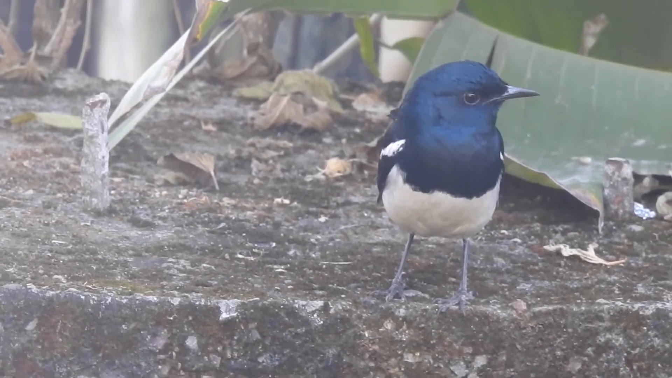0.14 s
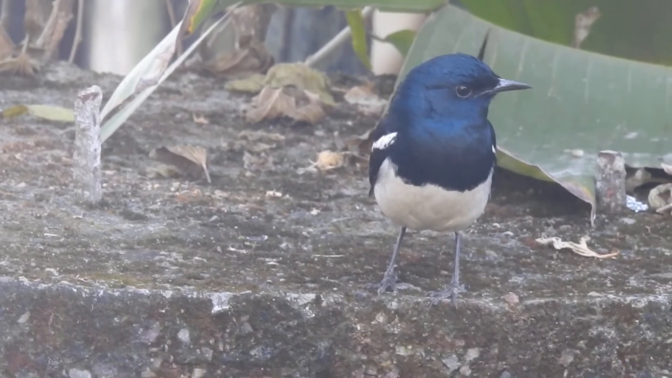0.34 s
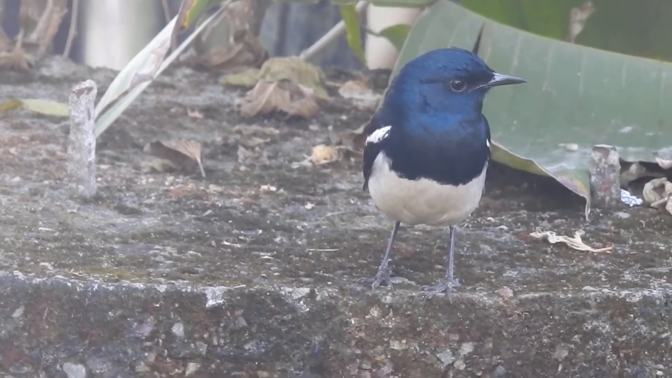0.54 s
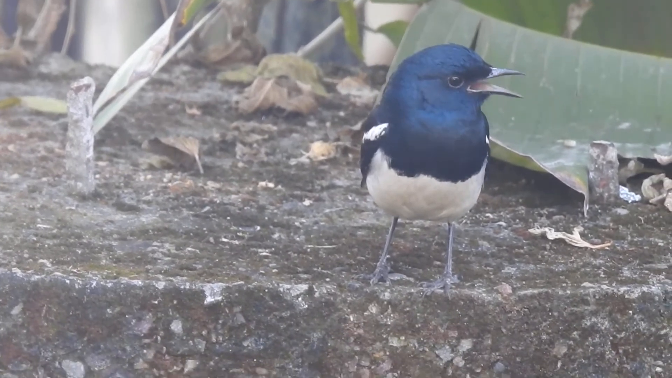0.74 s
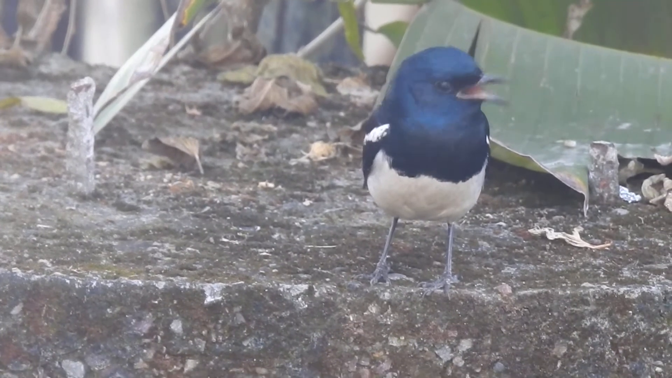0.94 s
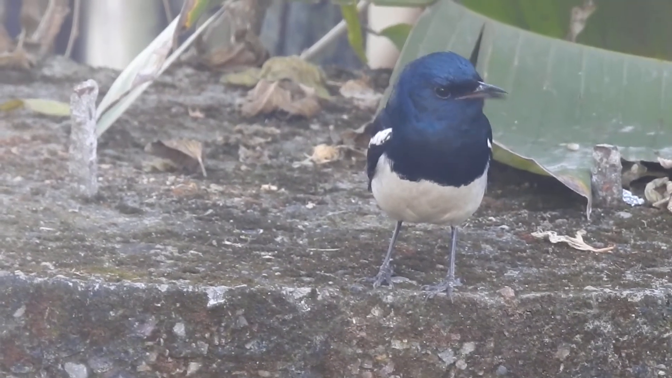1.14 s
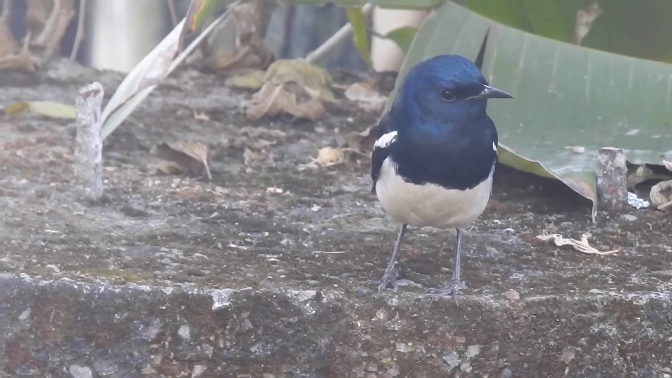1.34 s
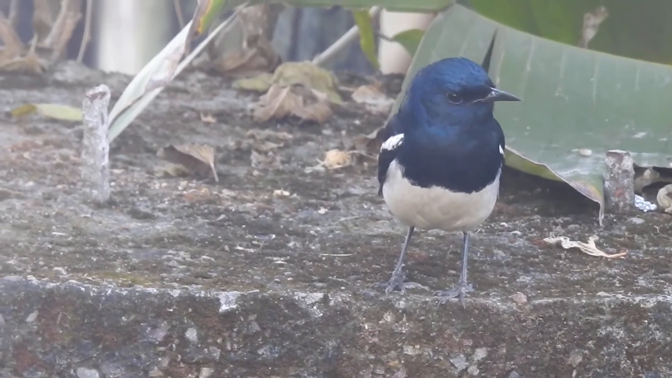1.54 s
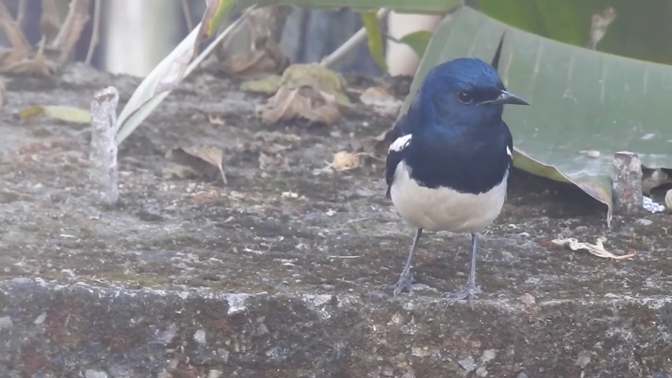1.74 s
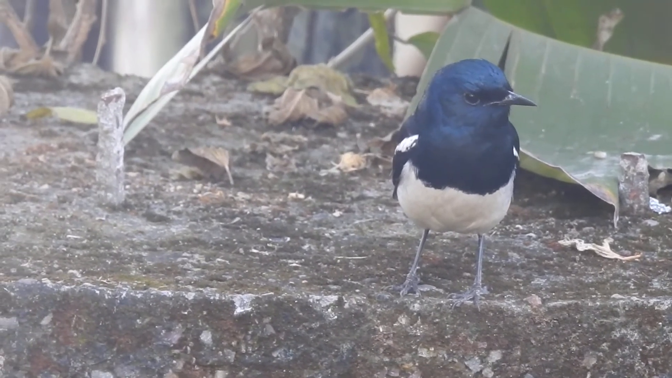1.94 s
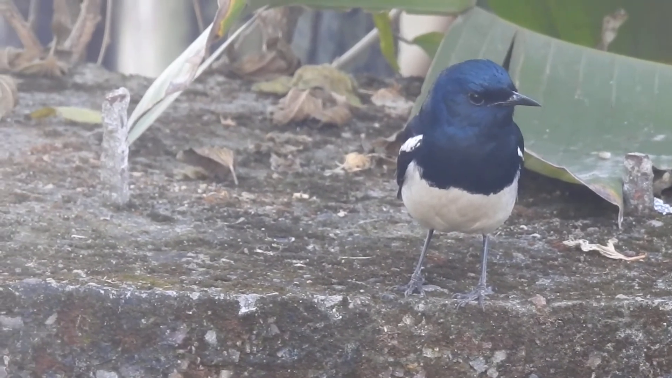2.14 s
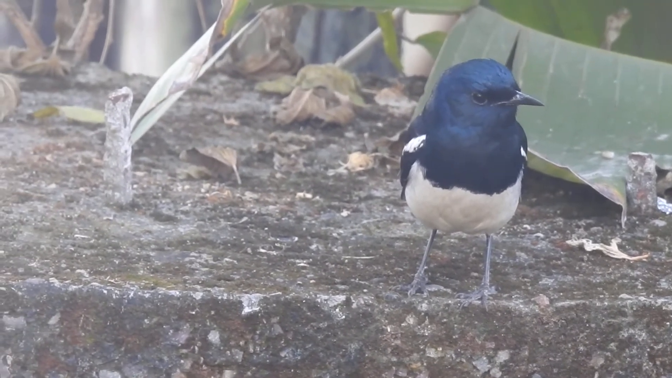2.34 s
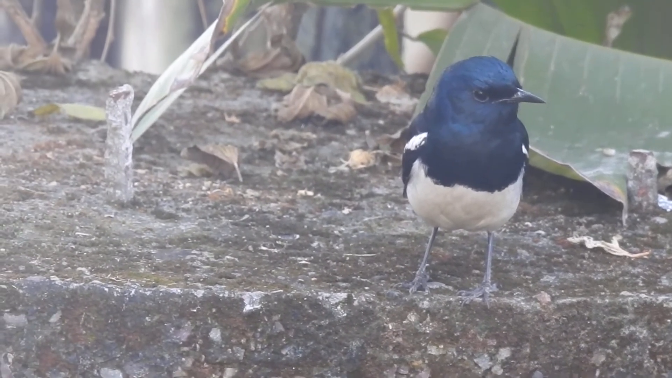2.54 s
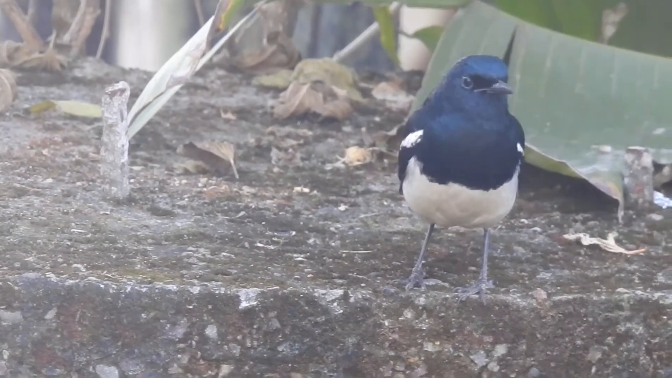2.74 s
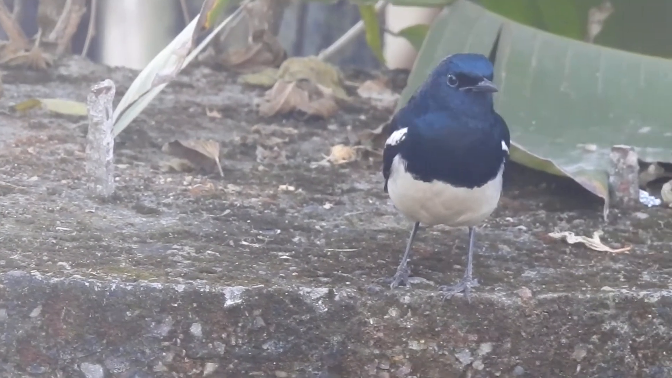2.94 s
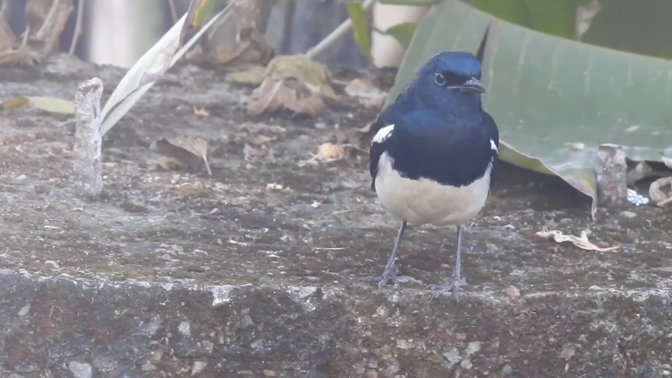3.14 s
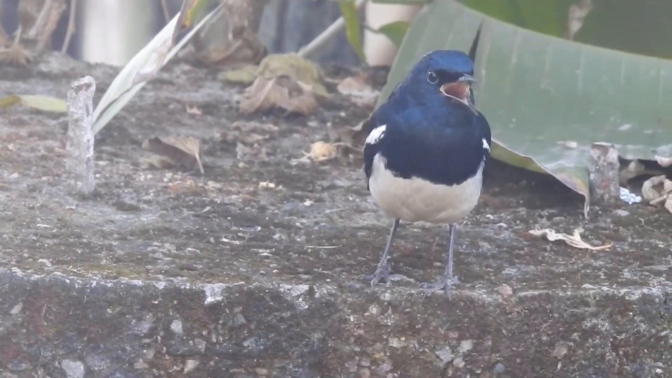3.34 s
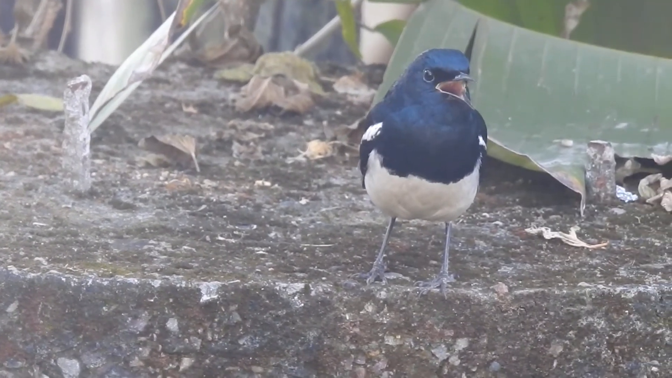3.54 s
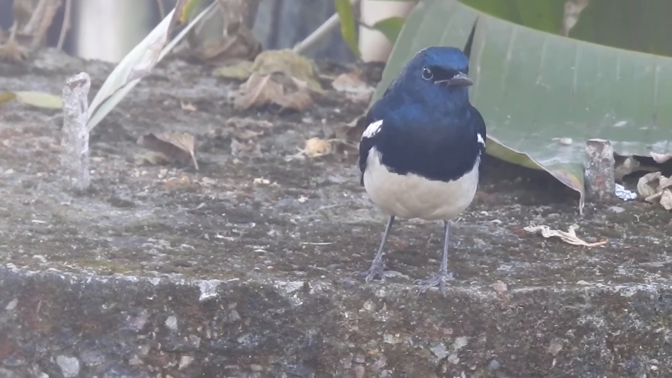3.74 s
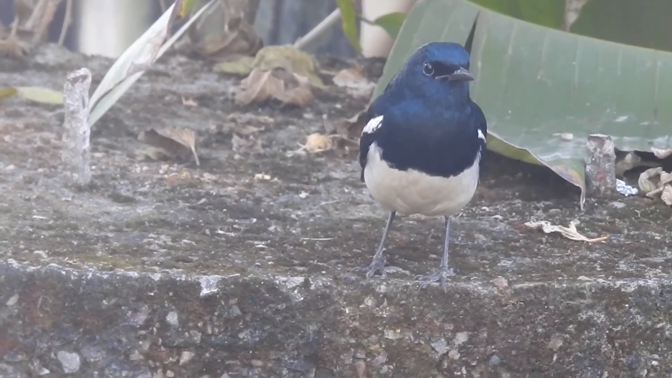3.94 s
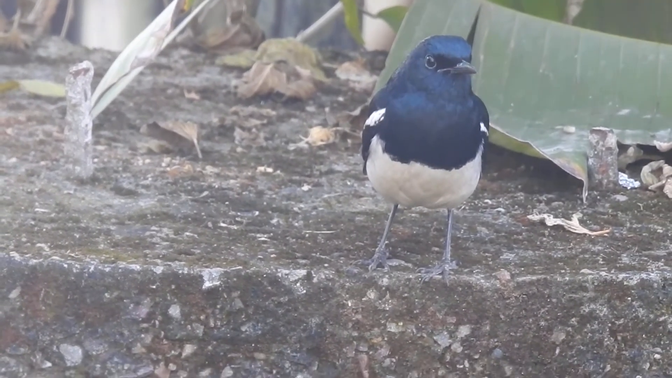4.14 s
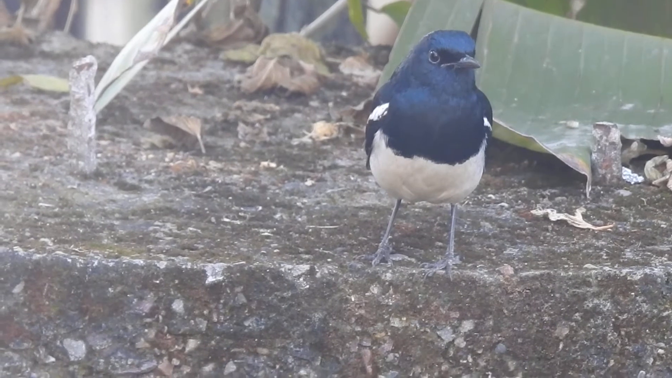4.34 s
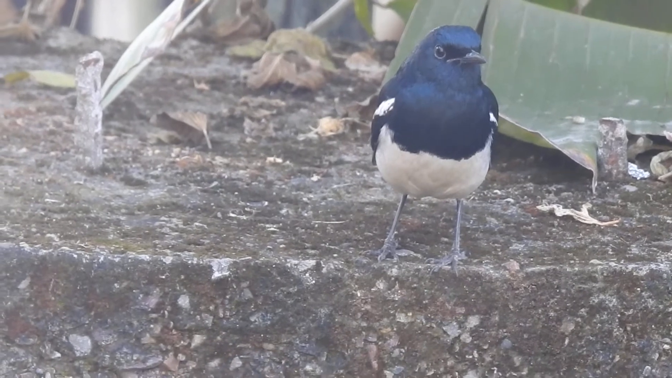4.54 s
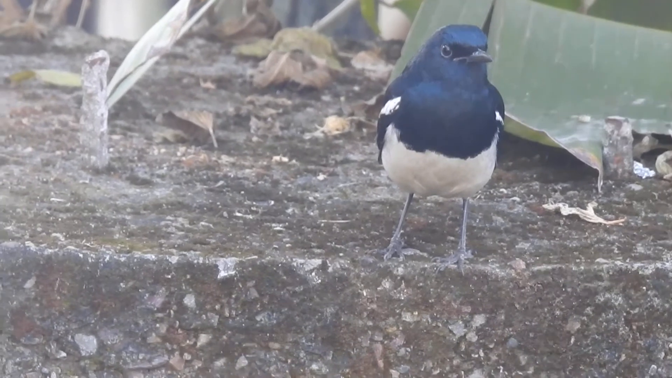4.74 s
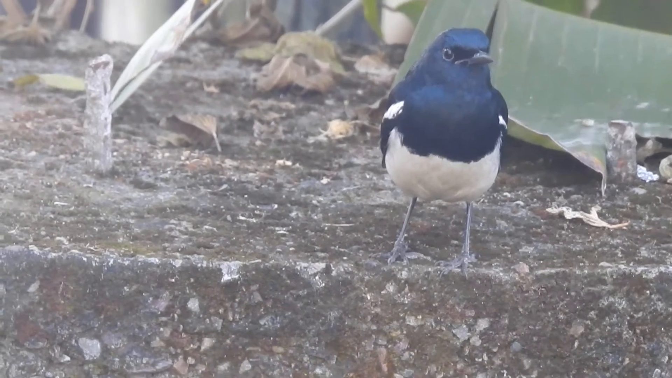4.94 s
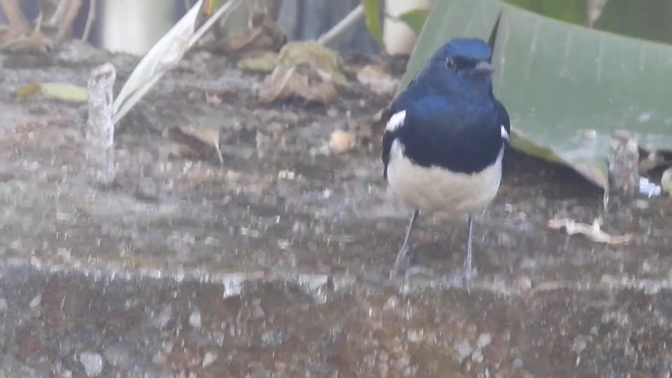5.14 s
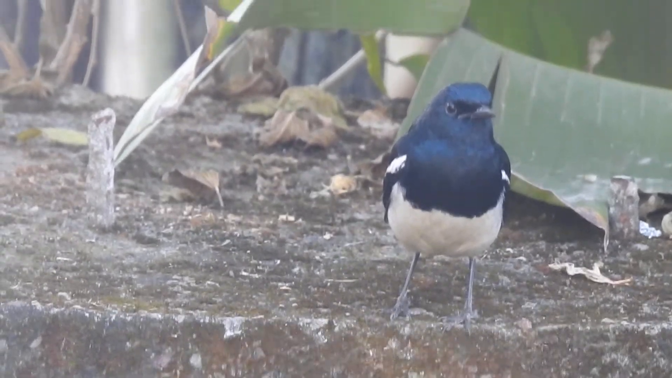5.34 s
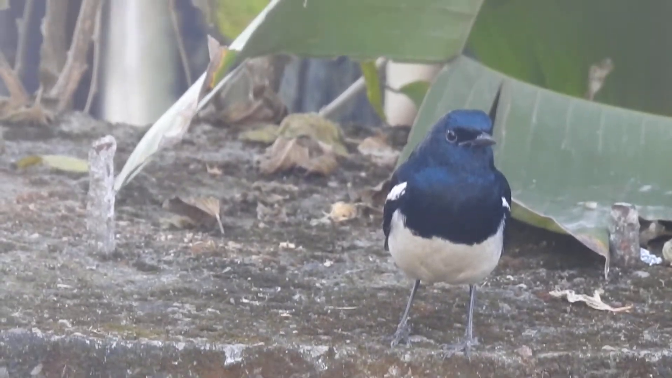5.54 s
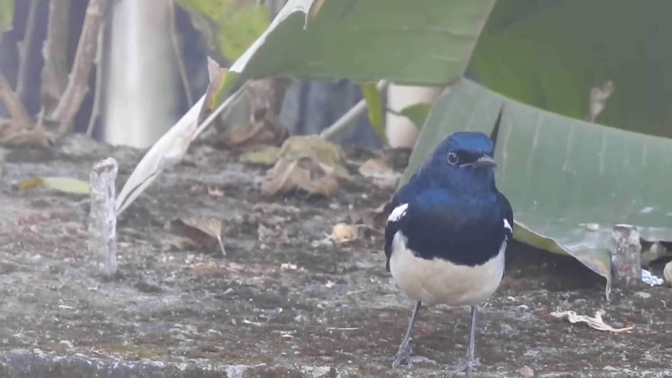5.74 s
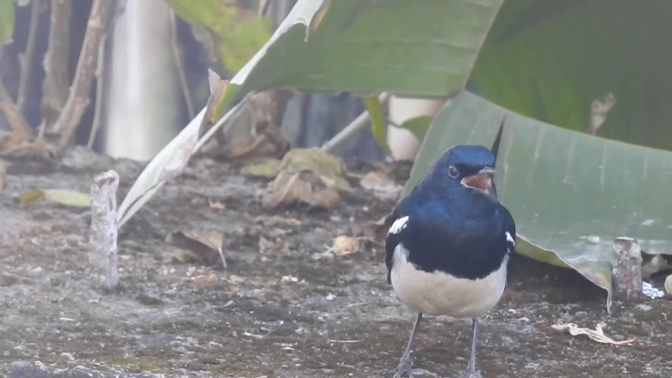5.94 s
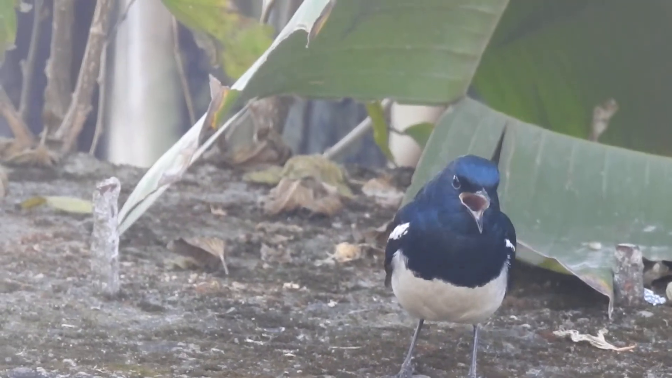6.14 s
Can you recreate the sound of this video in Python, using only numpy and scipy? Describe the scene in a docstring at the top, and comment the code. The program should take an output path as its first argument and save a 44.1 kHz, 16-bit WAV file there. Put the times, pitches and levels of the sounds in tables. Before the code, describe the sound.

Piercing down-slurred bird whistles, each growing raspy, ring out three times in a garden while distant rumble and brief microphone wind thumps sit underneath.

```python
"""A distant town rumbles under a soft high hiss; then a magpie-robin on a garden wall gives three whistles
that slide downward and turn husky, the last still sounding at the end. Each is a gliding sine that gains
noise, overtones and a second voice. Walls and foliage return the notes as echoes and scattered paths. A far
bird chirps in short raspy glides. Gusts, as swelling low noise, and a few filtered pressure kicks buffet the
microphone, mostly on the right."""
import sys
import numpy as np
from scipy import signal
from scipy.fft import rfft, irfft, next_fast_len
from scipy.io import wavfile
from scipy.ndimage import uniform_filter1d, minimum_filter1d

SR = 44100
rng = np.random.default_rng(int(sys.argv[2]) if len(sys.argv) > 2 else 0)


def store_pcm(level_fs):
    """Save levels as 16-bit WAV."""
    pcm = np.round(np.clip(level_fs, -1, 1) * 32767).astype(np.int16)
    wavfile.write(sys.argv[1], SR, np.atleast_2d(pcm).T)


N = 273861
TIME = np.arange(N) / SR   # seconds

# The robin's whistles. Each row: start in seconds, length in seconds, start pitch in Hz, shelf pitch in Hz,
# settling time in seconds, age at the step in seconds, age at which the hold ends in seconds, end pitch in Hz,
# level in dB before the mix, attack in seconds, age at softening in seconds, late push in dB, age when
# huskiest in seconds, peak huskiness in dB, overtone offset in dB, second voice's start pitch in Hz,
# second voice's offset in dB.
WHISTLE_NOTES = [(0.712, .492, 6235, 5120, .084, 0.047, .31, 4550, -11.5, 0.0075, .14, 2, 0.37, -56, 2.5, 4510, -3),
                 (3.244, .508, 6140, 4988, .132, 0.14, .355, 4260, -12, 0.014, 0.21, 1.5, 0.33, -54.5, -1.5, 4510, -1.5),
                 (5.916, .32, 6010, 5213, 0.1207, 0.1234, .33, 4500, -11.5, 0.018, 0.28, 2, .26, -54.5, -3, 4690, -1)]
# Colour of the husky breath. Each row: frequency in Hz, relative level in dB.
HUSK_SPECTRUM = [(2500, -23), (3300, -7.5), (4500, 0.5), (5800, -12), (6500, 4.5), (7400, -5), (8700, -9),
                 (9500, -23.5), (11000, -33.5), (15500, -33.5)]
# Near reflections. Each row: delay left in seconds, delay right in seconds, level in dB re the direct sound.
NEAR_ECHOES = [(.0062, .0065, -10), (0.0161, .0161, -7.5), (0.033, 0.053, -19.5), (.058, .0573, -27),
               (0.103, .105, -27)]
# The far bird's glides. Each row: start in seconds, length in seconds, start pitch in Hz, end pitch in Hz,
# peak level in dB.
FAR_CHIRPS = [(2.39, 0.056, 3120, 3450, -42), (2.528, 0.053, 3150, 2916, -45.5),
              (2.569, 0.035, 2780, 2780, -53), (2.632, 0.06, 3320, 2870, -44.5),
              (2.677, 0.07, 2950, 2740, -47)]
# Turbulent gusts. Each row: centre in seconds, width in seconds, level in dB before the wind gain and pan.
WIND_GUSTS = [(2.61, 0.05, -35.5), (2.96, 0.014, -34.5), (3.14, 0.083, -38), (3.51, 0.041, -39),
              (4.11, 0.08, -37.5), (4.76, 0.13, -32), (5.23, 0.17, -41)]
# Colour of the gusts. Each row: frequency in Hz, relative level in dB.
GUST_SPECTRUM = [(20, -18.5), (40, 0.5), (68, 1.5), (105, -7), (160, -21), (300, -49.5), (900, -100)]
# Eddies that kick a port, singly or in a dying run. Each row: start in seconds, peak level in dB,
# left minus right in dB, number of kicks.
EDDY_KICKS = [(3.168, -26.5, -10, 1), (4.689, -11, -32, 4), (5.352, -26.5, -22, 1)]
# Course of the background level, which sinks under the whistles. Each row: time in seconds,
# level in dB before the background gain.
BACKGROUND_LEVEL = [(0, -52.5), (0.65, -53.5), (0.8, -56.5), (1.35, -56.5), (1.5, -53), (2.45, -53),
                    (3.0, -56), (3.6, -58), (4.1, -57), (5.55, -55.5), (5.87, -52), (6.0, -57)]
# Colour of the town. Each row: frequency in Hz, relative level in dB.
TOWN_SPECTRUM = [(20, -24.5), (40, -13.5), (75, -7), (96, 1), (120, -6.5), (200, -6.5), (330, -13.5),
                 (490, -14), (670, -13), (900, -18), (1700, -20.5), (3500, -25), (4600, -40.5),
                 (8000, -100)]
# The clearest swells in the distant din. Each row: centre in seconds, width in seconds, pitch in Hz,
# level in dB.
DISTANT_SWELLS = [(0.34, 0.043, 727, -49), (0.499, 0.076, 650, -52.5), (1.141, 0.047, 616, -50),
                  (2.5, 0.25, 636, -56.5), (3.1, 0.055, 462.5, -55.5), (5.149, 0.058, 549, -52)]
# Colour of the high hiss. Each row: frequency in Hz, relative level in dB.
HISS_SPECTRUM = [(1500, -35), (2500, -16), (3500, -9), (4800, -5.5), (6000, -1), (6600, -1.5), (7300, -9),
                 (8100, -16.5), (8800, -17.5), (9500, -23.5), (12000, -29), (15800, -31.5)]
# Likeness of the two channels in diffuse sound. Each row: frequency in Hz, left-right correlation (no unit).
CHANNEL_LIKENESS = [(40, 0.98), (120, .85), (500, 0.87), (1200, 0.82), (3000, 0.73), (6000, 0.16),
                    (12000, 0.14)]

# Pitch: a downward flick, a slide that hesitates once and catches up, a hold, a fall
FLICK_HZ, FLICK_S = 199, 0.007
STEP_HZ, STEP_WIDTH_S = 85.4, 0.02   # the deviation peaks at 0.61 of STEP_HZ
SETTLE_SHAPE, FALL_HZ_PER_S = 1.3, 4000
# Effort: the note swells, is loud, then softens; a long note is pushed once more near its end
ONSET_DB, SOFT_DB, SOFTEN_S = -13, -7, 0.022
PUSH_AT_S, PUSH_WIDTH_S = 0.442, 0.031
# Huskiness comes in one swell; the second voice follows it (dB per dB) and slides down
CLEAR_DB, HUSKY_WIDTH_S = -68.5, 0.1
UNDERTONE_DB, UNDERTONE_FOLLOWS, UNDERTONE_FALL_HZ_PER_S = -71, 1.93, 2950
GARDEN_T60_S = 0.69
GUST_PAN_DB = -15.5   # left minus right
BREEZE_DB, BREEZE_AT_S, BREEZE_WIDTH_S = -41.5, 4.19, 0.28   # a slow swell under the gusts
KICK_GAP_S, KICK_LOSS_DB = 0.042, 5
HISS_DB, HISS_DRIFT_DB = -47, 0.7
CUTOFF_HZ = 15800


def whistle(row, start_s=0.0045, release_s=0.0028, wander=0.0024, waver=0.0019, jitter=0.0007,
            flutter_db=1.0, hiss_db=12, second_db=-23, third_db=-40, edge_growth=0.53,
            sum_db=3, difference_db=-4, unsteady=0.04):
    """Two coupled sources: a nearly pure tone gains hiss, overtones and a second voice as it turns husky."""
    (s, length, start_hz, shelf_hz, settle_s, step_s, held_s, end_hz, loud_db, attack_s, loud_s, push_db,
     husky_s, huskiest_db, overtones_db, under_start_hz, under_extra_db) = row
    age = np.clip(TIME - s, 0, length + release_s)
    opening = np.clip(age / start_s, 0, 1)
    closing = np.clip((length - age) / release_s + 1, 0, 1)

    level_db = loud_db + effort(age, attack_s, loud_s, push_db) + flutter_db * drift(30)
    husky_db = CLEAR_DB + (huskiest_db - CLEAR_DB) * bump(age, husky_s, HUSKY_WIDTH_S)
    hz = glide(age, start_hz, shelf_hz, settle_s, step_s, held_s, end_hz)
    unsteadiness = wander * drift(8.7) + waver * drift(45) + jitter * drift(430)
    phase = cycles(uniform_filter1d(hz, size=500) * (1 + unsteadiness))

    # overtones grow with huskiness, and as they sink into the range that the beak lets out
    beak_db = 0.51 * at_hz(HUSK_SPECTRUM, 2 * hz)
    edge = from_db(overtones_db + edge_growth * (husky_db - level_db + 36.5) + beak_db)
    overtones = from_db(second_db) * np.sin(2 * phase) + from_db(third_db) * np.sin(3 * phase)
    tone = np.sin(phase) + edge * overtones

    # the unsteady second voice of the syrinx mixes with the first into sum and difference tones
    under_hz = under_start_hz - UNDERTONE_FALL_HZ_PER_S * age
    under_db = UNDERTONE_DB + UNDERTONE_FOLLOWS * (husky_db - CLEAR_DB) + under_extra_db
    under = cycles(under_hz * (1 + unsteady * drift(350)))
    sum_tone = from_db(sum_db + at_hz(HUSK_SPECTRUM, hz + under_hz)) * np.sin(phase + under)
    difference_tone = from_db(difference_db) * np.sin(2 * phase - under)
    second_voice = np.sin(under) + sum_tone + difference_tone

    voiced = np.sqrt(2) * (from_db(level_db) * tone + from_db(under_db) * second_voice)
    breath = from_db(hiss_db + husky_db) * noise(HUSK_SPECTRUM)
    return opening * closing * (voiced + breath)


def glide(age, start_hz, shelf_hz, settle_s, step_s, held_s, end_hz):
    """Frequency modulation: pitch relaxes to a shelf with one step, then past the hold falls to its end."""
    settling = shelf_hz + (start_hz - shelf_hz) * np.exp(-(age / settle_s) ** SETTLE_SHAPE)
    falling = np.maximum(settling - FALL_HZ_PER_S * np.maximum(age - held_s, 0), end_hz)
    step = STEP_HZ * (step_s - age) / STEP_WIDTH_S * bump(age, step_s, STEP_WIDTH_S)
    flick = FLICK_HZ * np.exp(-age / FLICK_S)
    return falling + step + flick


def effort(age, attack_s, loud_s, push_db):
    """Amplitude envelope in dB relative to the loud opening: exponential onset, softening, late push."""
    onset = ONSET_DB * np.exp(-age / attack_s)
    softened = 0.5 + 0.5 * np.tanh((age - loud_s) / SOFTEN_S)
    return onset + SOFT_DB * softened + push_db * bump(age, PUSH_AT_S, PUSH_WIDTH_S)


def garden(x, scatter_db, early_db=3, early_t60=0.087, spread=0.61, paths_per_s=900):
    """Reflection and scattering: a few discrete echoes, then sparse paths that decay at two rates."""
    t = np.arange(SR) / SR
    mid, side = rng.standard_normal((2, SR)) * (rng.random((2, SR)) < paths_per_s / SR)
    paths = mid + spread * side * [[1], [-1]]   # partly alike in the two channels
    decay = from_db(-60 * t / GARDEN_T60_S) + from_db(early_db - 60 * t / early_t60)
    fade = decay * (t > 0.004)
    response = from_db(scatter_db) * rms_one(paths * fade) / np.sqrt(SR)
    for left_s, right_s, level_db in NEAR_ECHOES:
        response[[0, 1], [int(left_s * SR), int(right_s * SR)]] += from_db(level_db)
    return x + signal.fftconvolve(x[None], response, axes=1)[:, :N]


def far_bird(rough=0.045):
    """Random frequency modulation of short gliding sines makes them raspy."""
    out = np.zeros(N)
    rasp = 1 + rough * drift(450)
    for s, length, start_hz, end_hz, level_db in FAR_CHIRPS:
        along = np.clip((TIME - s) / length, 0, 1)
        hz = start_hz + (end_hz - start_hz) * along
        out += from_db(level_db) * np.sin(np.pi * along) * np.sin(cycles(hz * rasp))
    return out


def wind():
    """Turbulence: each gust is a swell of low noise, independent at each microphone port."""
    swelling = [*WIND_GUSTS, (BREEZE_AT_S, BREEZE_WIDTH_S, BREEZE_DB)]
    power = sum((from_db(level_db) * bump(TIME, s, width)) ** 2 for s, width, level_db in swelling)
    eddies = np.array([noise(GUST_SPECTRUM), noise(GUST_SPECTRUM)])
    evened = eddies / np.sqrt(uniform_filter1d(eddies ** 2, size=1800))   # constant short-term power
    return np.sqrt(power) * evened * from_db([[GUST_PAN_DB], [0]])


def thumps(low_hz=45, high_hz=115, soft_hz=190):
    """Impulse response: the microphone's bass cut turns an eddy's pressure kick into a short swing."""
    kicks = np.zeros((2, N))
    for s, peak_db, pan_db, count in EDDY_KICKS:
        channel_db = np.minimum([pan_db, -pan_db], 0)   # attenuate only the weaker side
        for k in range(round(count)):
            at = int((s + k * KICK_GAP_S) * SR)
            kicks[:, at] = from_db(peak_db - k * KICK_LOSS_DB + channel_db)
    band = signal.butter(2, [low_hz, high_hz], "band", fs=SR, output="sos")
    softening = signal.butter(2, soft_hz, fs=SR, output="sos")
    port = np.vstack([band, softening])
    unit_peak = abs(signal.sosfilt(port, signal.unit_impulse(SR))).max()
    return signal.sosfilt(port, kicks + 1e-18) / unit_peak


def town(gain_db):
    """Superposition: a diffuse rumble follows the background level and carries a few clearer swells."""
    level_db = np.interp(TIME, *np.transpose(BACKGROUND_LEVEL)) + gain_db
    return from_db(level_db) * mottled(diffuse(TOWN_SPECTRUM)) + swells()


def mottled(x, patchy_db=3.5, size=2048):
    """Random time-frequency modulation: narrow bands rise and fade independently over about 0.16 s."""
    frames = signal.stft(x, nperseg=size)[2]
    patches = rng.standard_normal(frames.shape[1:])
    patches = uniform_filter1d(patches, size=3, axis=0)   # across frequency
    patches = uniform_filter1d(patches, size=7, axis=1)   # along time
    uneven = frames * from_db(patchy_db * rms_one(patches))
    return rms_one(signal.istft(uneven, nperseg=size)[1][:, :N])


def swells(wander_hz=35):
    """Narrow-band noise: slow random quadrature parts model far sounds blurred by distance."""
    out = np.zeros(N)
    for s, width, hz, level_db in DISTANT_SWELLS:
        angle = 2 * np.pi * hz * TIME
        blur = drift(wander_hz) * np.sin(angle) + drift(wander_hz) * np.cos(angle)
        out += from_db(level_db) * bump(TIME, s, width) * blur
    return out


def high_hiss():
    """Filtered diffuse noise whose level drifts slightly."""
    return from_db(HISS_DB + HISS_DRIFT_DB * drift(3)) * diffuse(HISS_SPECTRUM)


def diffuse(spectrum):
    """Diffuse field: sum and difference noises set a channel correlation that falls in the treble."""
    size = next_fast_len(N)
    hz = np.fft.rfftfreq(size, 1 / SR)
    alike = np.clip(at_hz(CHANNEL_LIKENESS, hz), -1, 1)
    mid, side = rfft(rng.standard_normal((2, size)))
    both = np.sqrt(1 + alike) * mid + np.sqrt(1 - alike) * side * [[1], [-1]]
    return rms_one(irfft(both * from_db(at_hz(spectrum, hz)), size)[:, :N])


def noise(spectrum):
    """Spectral shaping: white noise is weighted to a given colour at unit rms."""
    size = next_fast_len(N)
    hz = np.fft.rfftfreq(size, 1 / SR)
    white = rfft(rng.standard_normal(size))
    return rms_one(irfft(white * from_db(at_hz(spectrum, hz)), size)[:N])


def drift(rate):
    """Low-pass random process of unit rms; rate is its corner in Hz."""
    hz = np.fft.rfftfreq(N, 1 / SR)
    white = rfft(rng.standard_normal(N))
    return rms_one(irfft(white / (1 + (hz / rate) ** 2), N))


def cycles(hz):
    """Phase in radians is the time integral of frequency."""
    return 2 * np.pi * np.cumsum(hz) / SR


def bump(t, centre, width):
    """Gaussian swell of height 1."""
    return np.exp(-0.5 * ((t - centre) / width) ** 2)


def at_hz(points, hz):
    """Interpolation of a spectrum along a log-frequency axis."""
    f, value = np.transpose(points)
    return np.interp(np.log(hz + 1e-3), np.log(f), value)


def from_db(db):
    """Amplitude ratio of a level in decibels."""
    return 10 ** (np.asarray(db) / 20)


def rms_one(x):
    """Normalisation to unit root-mean-square."""
    return x / np.sqrt(np.mean(x ** 2) + 1e-20)


def scene(robin_db=0.13, robin_pan_db=-0.1, background_db=8.0, town_pan_db=-0.63, wind_db=1):
    """Linear superposition of the birds in the garden, town, hiss and wind."""
    robin = garden(sum(whistle(row) for row in WHISTLE_NOTES), scatter_db=-7.0)
    # each pan value is half the left-right difference
    robin = from_db(robin_db) * robin * from_db([[robin_pan_db], [-robin_pan_db]])
    birds = robin + garden(far_bird(), scatter_db=-7.5)
    din = town(background_db) * from_db([[town_pan_db], [-town_pan_db]])
    hiss = high_hiss()
    buffeting = from_db(wind_db) * wind() + thumps()
    return birds + din + hiss + buffeting


def record(dry, ceiling=0.71):
    """Peak limiting by a fast shared gain, then a steep elliptic low-pass."""
    needed = np.minimum(1, ceiling / (abs(dry).max(axis=0) + 1e-9))
    gain = uniform_filter1d(minimum_filter1d(needed, size=41), size=21)
    low_pass = signal.ellip(10, 0.1, 80, CUTOFF_HZ, fs=SR, output="sos")
    return signal.sosfilt(low_pass, dry * gain)


dry = scene()
out = record(dry)
store_pcm(out)
```